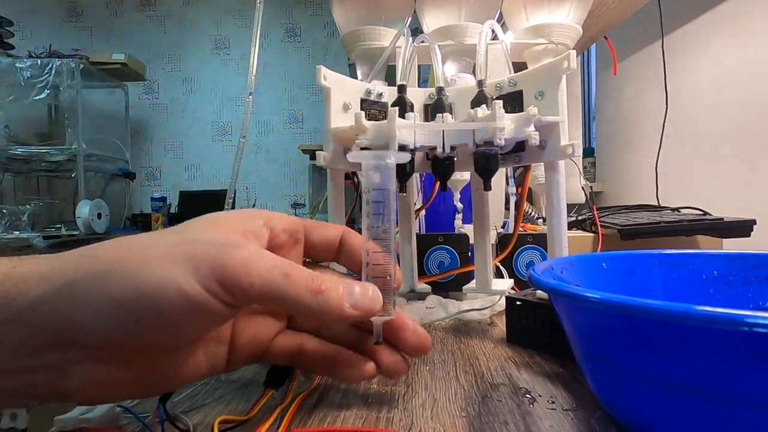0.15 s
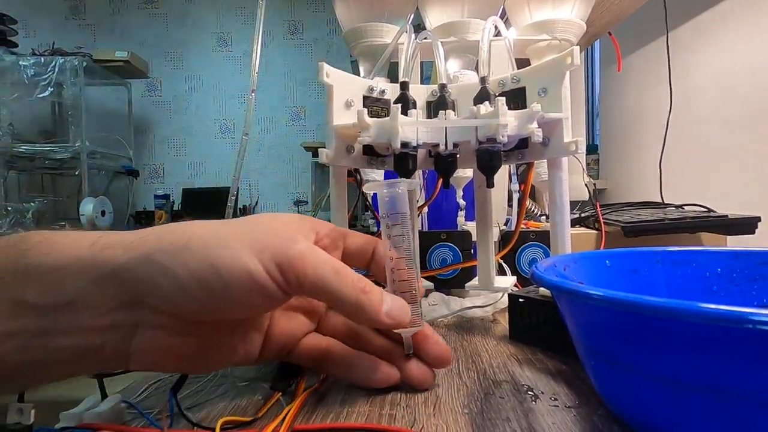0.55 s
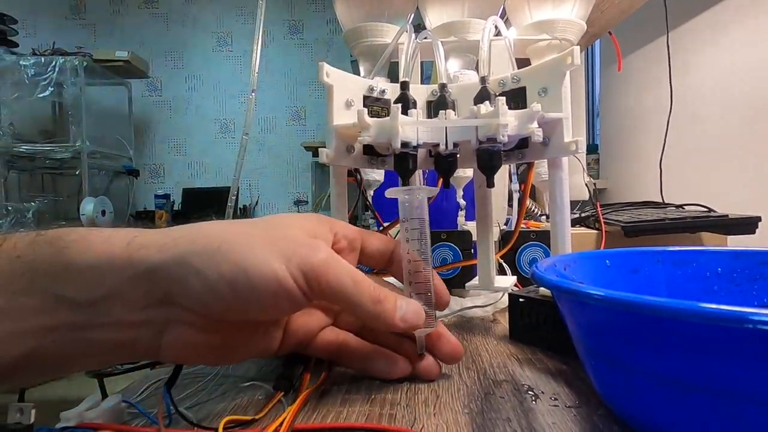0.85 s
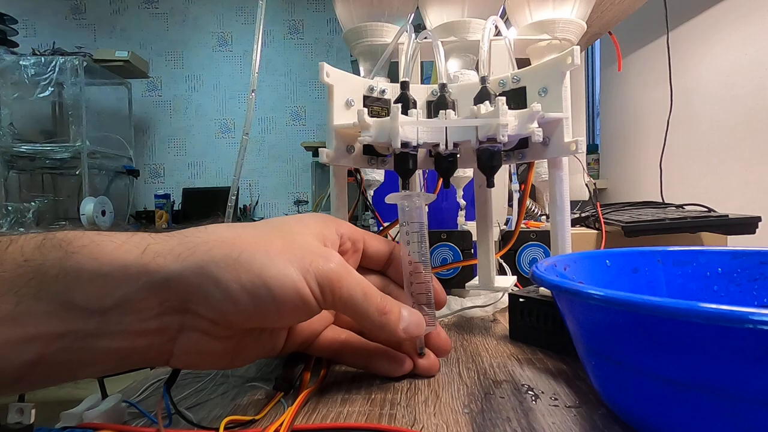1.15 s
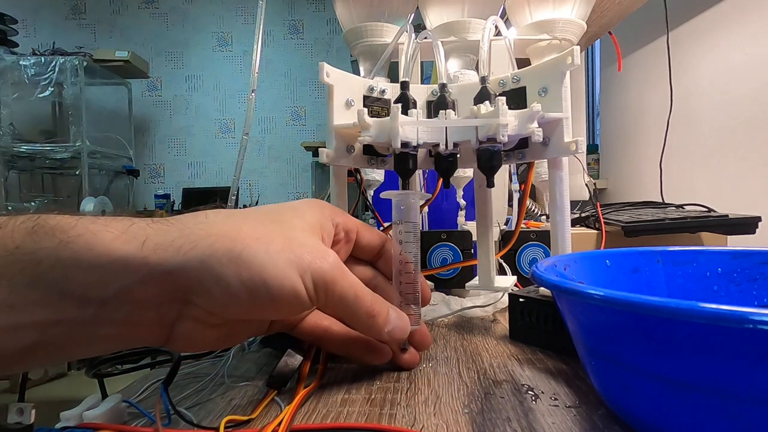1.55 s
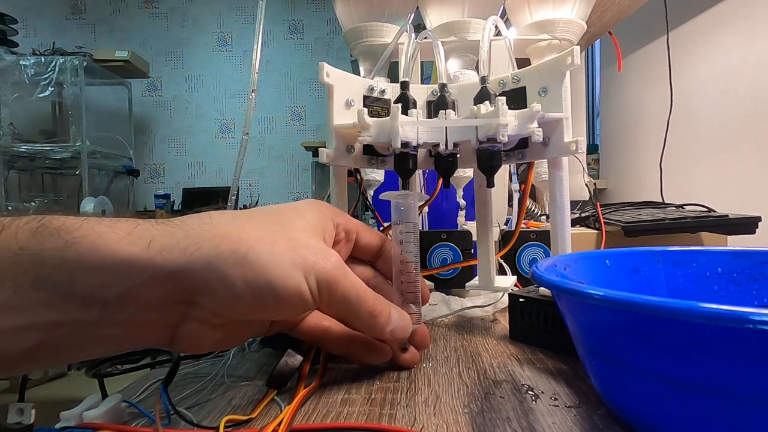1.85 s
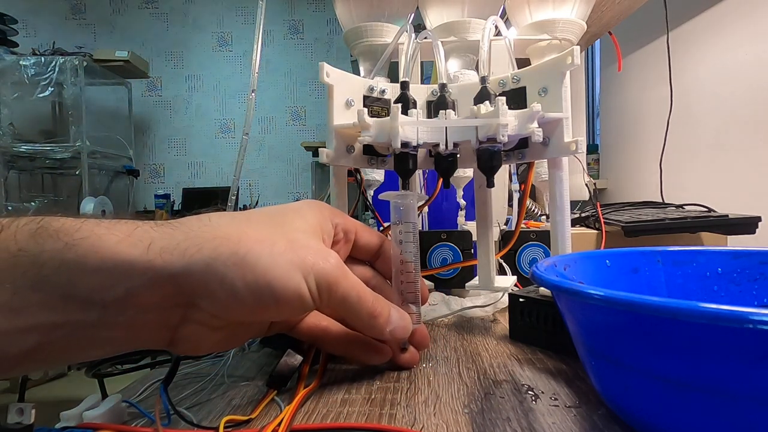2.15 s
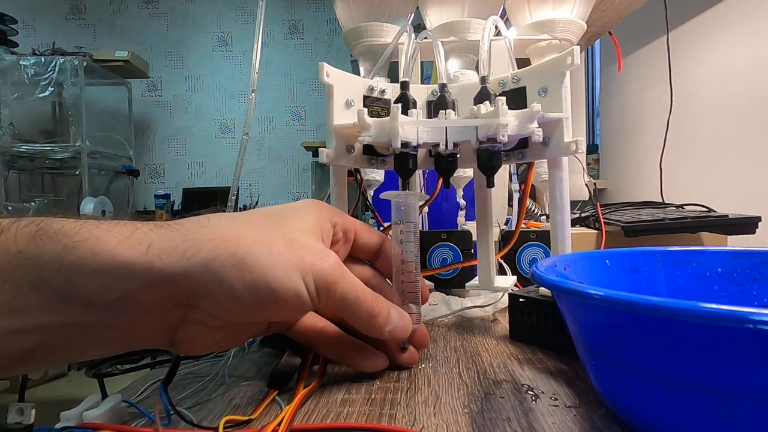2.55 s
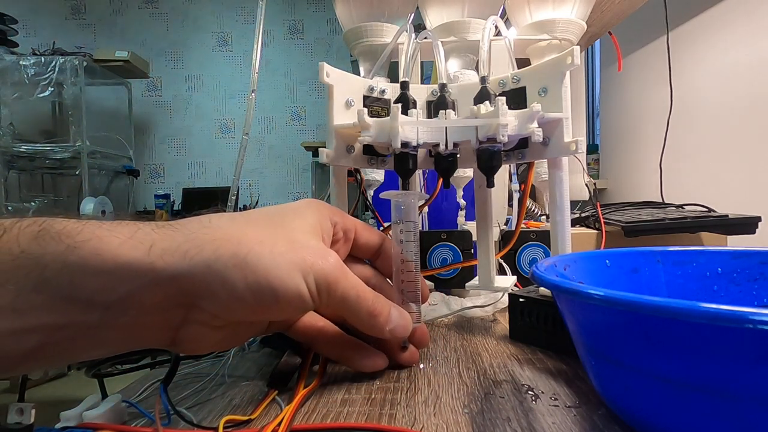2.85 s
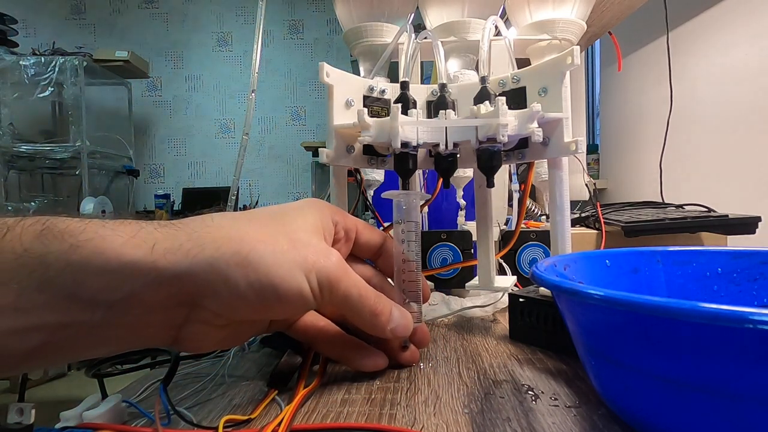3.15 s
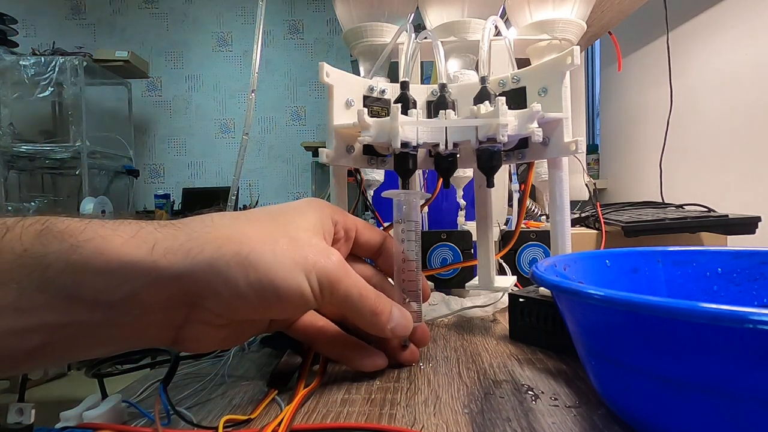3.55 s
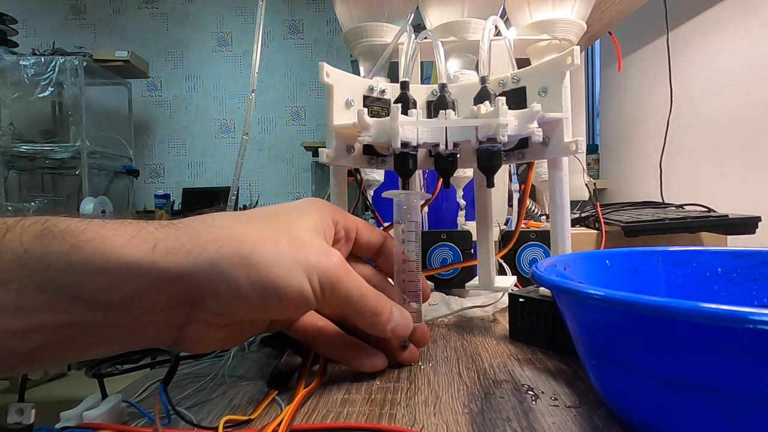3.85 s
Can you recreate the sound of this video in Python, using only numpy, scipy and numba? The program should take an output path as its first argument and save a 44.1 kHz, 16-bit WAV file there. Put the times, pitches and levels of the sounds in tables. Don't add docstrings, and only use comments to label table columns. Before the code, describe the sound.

A small pump motor starts after a switch click, rising quickly into a steady buzzing whirr

```python
import sys
import numpy as np
from scipy import signal
from scipy.fft import rfft, irfft
from scipy.io import wavfile
from scipy.ndimage import uniform_filter1d
from numba import njit

SR = 44100
rng = np.random.default_rng(int(sys.argv[2]) if len(sys.argv) > 2 else 0)


def to_wav(sig):
    pcm = np.clip(np.atleast_2d(sig), -1, 1) * 32767
    pcm = np.round(pcm).astype(np.int16)
    wavfile.write(sys.argv[1], SR, pcm.T)


def attenuation_scalar(level_db):
    decades = np.asarray(level_db, float) / 20
    return 10 ** decades


N = 176400

# frequency in Hz, level in dB per Hz.
ROOM_SPECTRUM = [(15, -31.5), (25, -6), (124, -6), (147, -4.5), (189, 1), (227, -7), (389, -3.5),
                 (657, -10.5), (900, -22.5), (1170, -40.5), (1980, -120)]
# frequency in Hz, level in dB per Hz.
AIR_SPECTRUM = [(530, -37.5), (900, -10), (1040, -1), (1120, -6.5), (1300, -0.5), (2050, -13), (3120, -13),
                (6100, -24.5), (15700, -38.5)]
# centre in Hz, width in Hz, level in dB.
ROOM_HUM = [(34.8, 12, -61.5), (63.6, 22, -60.5), (120.3, 15, -59.5), (185.3, 25, -56.5), (389, 98, -71.5),
            (666.4, 18, -60.5), (835.5, 6.4, -63.5), (1298, 99, -67.5), (3200, 610, -69.5),
            (8800, 900, -86)]
# centre in seconds, length in seconds, pitch in Hz, width in Hz, level in dB.
SKIN_RUBS = [(2.05, 0.024, 8000, 7000, -70.5), (2.098, .016, 9500, 2500, -66),
             (2.182, .015, 9300, 3000, -71), (2.24, .035, 8800, 3500, -71), (2.273, .03, 13000, 3000, -77),
             (2.4, 0.1, 13800, 5000, -76.5), (2.25, 0.2, 7000, 7960, -70)]
# start in seconds, snap in dB, spring ping in dB, thud in dB, case ring in dB.
SWITCH_CLICKS = [
    (2.0298, -21.5, -26, -20, -35.5),
    (2.1640, -34.5, -29.5, -20, -32),
]
# centre in Hz, width in Hz, level in dB.
SNAP_MODES = [(1880, 120, 1.5), (2590, 140, 3), (3900, 460, 0.5), (5200, 890, 1.5), (6880, 1700, 2),
              (7530, 390, 4), (14500, 4500, -9)]
# centre in Hz, width in Hz, level in dB.
THUD_MODES = [(300, 60, 9.3), (565, 113, 6), (800, 167, 2.3)]
# centre in Hz, width in Hz, level in dB.
CASE_MODES = [(1550, 120, -4.5), (1930, 93, -0.5), (2520, 130, 2.5), (5000, 270, -11.5)]
# start in seconds, level in dB, pitch in Hz.
PLASTIC_TICKS = [(0.2986, -32.5, 3250), (0.3691, -50, 3020), (1.711, -51, 5200), (2.548, -39.5, 3200),
                 (2.6623, -41, 3430), (2.6878, -42, 3000), (2.7193, -42, 3460), (2.833, -51, 3200),
                 (2.891, -46, 3460), (3.0121, -26.5, 3850), (3.0708, -31, 3460), (3.088, -46, 3400),
                 (3.1213, -38, 3460), (3.243, -40, 3500), (3.262, -36, 3700), (3.4126, -40, 3600),
                 (3.435, -35.5, 3160), (3.5296, -38, 3460), (3.5838, -36.5, 3450), (3.684, -37.5, 3450),
                 (3.7055, -25.5, 3590), (3.766, -36.5, 3430), (3.936, -34, 3600), (3.9402, -23, 3380)]
# time in seconds, level in dB.
STEP_FORCE = [(2.205, -19), (2.25, -18.5), (2.264, -14), (2.276, -19), (2.31, -19), (2.355, -16),
              (2.39, -20.5), (2.405, -19), (2.44, -22.5), (2.465, -24), (2.5, -20), (2.56, -24),
              (2.61, -44)]
# time in seconds, fast rock in dB, slow rock in dB.
ROTOR_ROCK = [(2.206, -46, -33), (2.214, -29, -25.5), (2.235, -28.5, -34), (2.256, -19, -26),
              (2.283, -27, -19), (2.302, -11.5, -37), (2.316, -22.5, -27), (2.33, -21, -39.5),
              (2.361, -22.5, -44)]
# centre in Hz, width in Hz, level in dB.
BASE_MODES = [(163.3, 8.2, 0.5), (264, 9.6, 7)]
# centre in Hz, width in Hz, level in dB.
FRAME_MODES = [(432, 130, -9), (587, 81, -2.5), (645, 64, -8.5), (988, 110, -15.5), (1212, 64, -4),
               (1305, 80, -4), (1460, 55, -14.5), (1682, 110, -17), (1904, 100, -27), (2210, 230, -36),
               (2700, 130, -24), (3460, 360, -26)]
# time in seconds, level in dB.
STEP_TONE = [(2.6, -37.5), (2.85, -39), (2.95, -38.5), (3.3, -38.5), (3.4, -33.5), (3.53, -40), (3.79, -35),
             (3.89, -38.5), (3.96, -34.5)]
# multiple of the step rate, level in dB, flicker in dB.
PARTIALS = [(.25, -42.5, 1.6), (.5, -58.5, 0.5), (1.75, -72.5, 1.5), (1.999, -65, 1), (2.5, -68, 1.5),
            (3, -60, -2), (3.5, -76.5, 3.5), (4, -79.5, -2.5), (4.25, -77.5, 1)]
# centre in Hz, width in Hz, heard level in dB,
# sideband level in dB, # share that follows the load (dB per dB).
FRAME_SHAKE = [(11.1, 8.8, -79, -20.5, .3), (35.7, 2.5, -51.5, -27, 0.18), (50.02, 2.2, -77.5, -9.5, .1),
               (65.4, 3.9, -51.5, -30, .2), (99.1, 4.4, -55.5, -22.5, 0.18), (132.8, 13, -57.5, -20.5, .5),
               (160.25, 14.4, -43.5, -10.5, 0.55), (177, 11.8, -47.5, -18, 0.98),
               (205.4, 5.3, -49.5, -32, 0.43), (259.6, 17, -47.5, -41, 0.5)]
# multiple of the throb rate, level in dB.
THROB_SIDEBANDS = [(1, -12), (2, -17.5), (3, -14.5), (4, -15)]
# centre in Hz, width in Hz, level in dB.
WHIRR_BANDS = [(568, 220, -52.5), (1010, 210, -54), (1238, 153, -45.5), (2270, 500, -67.5),
               (2850, 980, -64), (3450, 790, -60.5), (4930, 2000, -69.5)]
# centre in seconds, extra load in dB.
TUBE_SQUEEZES = [(2.705, 8), (2.945, 4.5), (3.355, 8.5), (3.45, 4), (3.595, 10), (3.735, 8), (3.93, 5.5)]


@njit
def state_variable(x, hz, width):
    y, b, l = np.empty(len(x)), 0., 0.
    g = np.tan(np.pi * hz / SR)
    for i in range(len(x)):
        k = width[i] / hz
        v = (b + g * (x[i] - l)) / (1 + g * (g + k))
        b, l, y[i] = 2 * v - b, l + 2 * g * v, k * v
    return y


def resonance(x, hz, width):
    return state_variable(x + 1e-18, float(hz), width + np.zeros(N))


def steep(x, hz, width):
    return resonance(resonance(x, hz, width), hz, width)


def body(x, modes, damp=1):
    return sum((-1) ** k * attenuation_scalar(db) * resonance(x, hz, width * damp) for k, (hz, width, db) in enumerate(modes))


def unit(x):
    return x / np.sqrt(np.mean(np.abs(x) ** 2))


def unit_peak(x):
    return x / np.abs(x).max()


def narrow(hz, width):
    return unit(steep(rng.standard_normal(N), hz, width))


def coloured(spectrum):
    f = np.maximum(np.arange(N // 2 + 1) * SR / N, 1)
    hz, db = np.transpose(spectrum)
    gain = attenuation_scalar(np.interp(np.log(f), np.log(hz), db))
    return unit(irfft(rfft(rng.standard_normal(N)) * gain, N))


def walk(rate):
    k = int(SR / rate)
    held = np.repeat(rng.standard_normal(N // k + 1), k)
    return unit(uniform_filter1d(uniform_filter1d(held, k), k)[:N])


def curve(table, col):
    return np.interp(np.arange(N) / SR, [r[0] for r in table], [r[col] for r in table])


def bump(t, centre_s, width_s):
    return np.exp(-((t - centre_s) / width_s) ** 2)


def burst(at_s, decay_s):
    t = np.arange(N) / SR - at_s
    return rng.standard_normal(N) * np.exp(-np.maximum(t, 0) / decay_s) * (t >= 0)


def place(x, pan_db, lag_us):
    late = np.interp(np.arange(N) - lag_us * 1e-6 * SR, np.arange(N), x)
    return np.array([late * attenuation_scalar(pan_db / 2), x * attenuation_scalar(-pan_db / 2)])


def room():
    hum = sum(attenuation_scalar(db + 2.14 * walk(5.86)) * narrow(hz, width) for hz, width, db in ROOM_HUM)
    low = attenuation_scalar(-46.5 + 0.43 * walk(1.95)) * coloured(ROOM_SPECTRUM)
    air = attenuation_scalar(-56.75 + 0.72 * walk(4.7)) * coloured(AIR_SPECTRUM)
    hiss = attenuation_scalar(-82.5) * narrow(13500, 5000)
    return low + air + hum + hiss * np.array([[1], [-1]])


def room_tail(x):
    t60_s, first_echo_s, centre_hz, level_db = 0.18, 0.004, 3080, -13
    t = np.arange(12000) / SR
    tail = rng.standard_normal(12000) * attenuation_scalar(-60 * t / t60_s) * (t > first_echo_s)
    tail = state_variable(tail + 1e-18, float(centre_hz), np.full(12000, 2. * centre_hz))
    tail = attenuation_scalar(level_db) * tail / np.sqrt(np.sum(tail ** 2))
    return signal.fftconvolve(x, tail[None], axes=1)[:, :N]


def finger():
    t = np.arange(N) / SR
    return sum(attenuation_scalar(db + 2.5 * walk(60)) * bump(t, s, length_s) * narrow(hz, width)
               for s, length_s, hz, width, db in SKIN_RUBS)


def switch():
    out = np.zeros(N)
    for s, snap_db, ping_db, thud_db, case_db in SWITCH_CLICKS:
        out += attenuation_scalar(snap_db) * unit_peak(body(burst(s, 0.00089), SNAP_MODES))
        out += attenuation_scalar(ping_db) * unit_peak(resonance(burst(s - 0.0004, 0.0014), 8740, 460))
        out += attenuation_scalar(thud_db) * unit_peak(body(burst(s + 0.0011, 0.0047), THUD_MODES))
        out += attenuation_scalar(case_db) * unit_peak(body(burst(s + 0.001, 0.0044), CASE_MODES))
    return out


def tick_modes(b, hz):
    t = np.zeros(N)
    t[:len(b)] = b
    sound = steep(t, hz, 1700) + attenuation_scalar(-12.5) * steep(t, 5600, 3200) + attenuation_scalar(-14) * resonance(t, 2600, 1800)
    return sound[:len(b)]


def ticks():
    out, t = np.zeros(N), np.arange(1024) / SR
    for s, db, hz in PLASTIC_TICKS:
        hit = rng.standard_normal(len(t)) * np.exp(-t / 0.0012)
        k = int(s * SR)
        out[k:k + len(t)] += attenuation_scalar(db - 3) * unit_peak(tick_modes(hit, hz))
    return out + attenuation_scalar(-41) * unit_peak(steep(burst(PLASTIC_TICKS[0][0], 0.0025), 1800, 900))


def chatter(speed):
    hits_per_s, level_db = 55, -65
    hits = (rng.random(N) < hits_per_s / SR) * attenuation_scalar(3.7 * rng.exponential(size=N)) * speed ** 2
    puffs = signal.lfilter([1], [1, -0.96], hits) * rng.standard_normal(N)
    return attenuation_scalar(level_db) * 10 * (steep(puffs, 2950, 1500) + attenuation_scalar(-10) * steep(puffs, 4800, 2300))


def motor_speed(t, start_s, full_s):
    start_hz, full_hz, slip = 60.27, 1152.3, 0.01793
    hz = np.interp(t, [start_s, full_s], [start_hz, full_hz]) * (t > start_s)
    hz = hz * (1 + slip * walk(45) * np.clip((full_s - t) / 0.033, 0, 1))
    return np.cumsum(hz) / SR, hz / full_hz


def rotor_rocking(t):
    first_s, last_s = ROTOR_ROCK[0][0], ROTOR_ROCK[-1][0]
    gate = np.clip((t - first_s) / 0.0045, 0, 1) * np.clip((last_s + 0.0077 - t) / 0.0069, 0, 1)
    gate = gate * attenuation_scalar(1.5 * walk(90))
    rock = 0
    for hz, col in [(265.4, 1), (152.4, 2)]:
        angle = 2 * np.pi * np.cumsum(hz * (1 + 0.0057 * walk(30.2))) / SR
        rock = rock + np.sqrt(2) * attenuation_scalar(curve(ROTOR_ROCK, col)) * gate * np.sin(angle)
    return rock


def step_train(t, phase, rock, start_s, full_s):
    uneven = 1 + 0.29 * rng.standard_normal(2000)[np.minimum(phase.astype(int), 1999)]
    shaken = phase + 0.35 * rock + 0.016 * walk(150)
    steps = sum(attenuation_scalar(-4.5 * np.log2(k)) * np.cos(2 * np.pi * k * shaken) for k in range(1, 9))
    gate = (t > start_s) * np.clip((full_s + 0.02 - t) / 0.027, 0, 1)
    return steps * uneven * attenuation_scalar(curve(STEP_FORCE, 1) + 2.8 * walk(80)) * gate


def ramp(t, phase, start_s, full_s):
    grip_s, rebound_s = 2.121, 0.01087
    rock = rotor_rocking(t)
    coast = attenuation_scalar(-42 + 3.7 * walk(40)) * narrow(245, 110)
    coast = coast * (t > ROTOR_ROCK[-1][0]) * np.clip((full_s - t) / 0.05, 0, 1)
    steps = step_train(t, phase, rock, start_s, full_s)
    push, rebound = bump(t, grip_s, 0.00085), bump(t, grip_s + rebound_s, 0.00082)
    grip = attenuation_scalar(-31.5) * 20 * (push - attenuation_scalar(3.5) * rebound)
    knock = attenuation_scalar(-21.5) * burst(grip_s - 0.002, 0.0041) + attenuation_scalar(-26) * burst(start_s + 0.00088, 0.0031)
    frame = attenuation_scalar(-6) * steep(knock, 1200, 2200)
    frame = frame + sum(attenuation_scalar(db) * steep(steps + knock, hz, width) for hz, width, db in FRAME_MODES)
    hold_damp = 1 + 6 * np.clip((t - 2.185) / 0.011, 0, 1)
    base = body(grip, BASE_MODES, hold_damp)
    return place(base + rock + coast, 0.26, 60) + place(frame, -0.19, 62)


def running(t, phase, speed, full_s):
    load_db = sum(db * bump(t, s, 0.035) for s, db in TUBE_SQUEEZES) - 3.5
    heard, carry, rumble = 0, 0, 0
    for hz, width, db, side_db, share in FRAME_SHAKE:
        shake = narrow(hz, width) * attenuation_scalar(share * load_db)
        if hz < 80:
            rumble = rumble + attenuation_scalar(db) * shake
        else:
            heard = heard + attenuation_scalar(db) * shake
        carry = carry + attenuation_scalar(side_db) * signal.hilbert(shake) / np.sqrt(2)
    throb = 2 * np.pi * 34.27 * (t - 2.859) + 0.22 * walk(5.4)
    carry = carry + sum(attenuation_scalar(db + 1.9 * walk(9)) * np.exp(1j * k * throb) for k, db in THROB_SIDEBANDS)

    turn = np.exp(2j * np.pi * phase)
    sidebands = 1 + carry + 0.05 * np.conj(carry)
    tone_level = np.sqrt(2) * attenuation_scalar(curve(STEP_TONE, 1) + 3.5 + 1.1 * walk(29.94))
    tone = tone_level * np.real(turn * sidebands)
    buzz = attenuation_scalar(-63.5) * np.real(turn ** 3 * unit(carry))
    parts = [np.sqrt(2) * attenuation_scalar(db + flicker_db * walk(11)) * np.cos(2 * np.pi * k * phase)
             for k, db, flicker_db in PARTIALS]
    whirr = [attenuation_scalar(db + 0.22 * load_db + 2.3 * walk(20)) * narrow(hz, width) for hz, width, db in WHIRR_BANDS]

    on = np.clip((t - full_s + 0.053) / 0.035, 0, 1)
    low = speed ** 0.33 * (t > ROTOR_ROCK[-1][0]) * heard + speed ** 3 * (parts[0] + parts[1] + whirr[0])
    middle = on * (tone + whirr[1] + whirr[2])
    high = on * (sum(parts[2:]) + buzz) + speed ** 0.93 * sum(whirr[3:])
    side = attenuation_scalar(-57) * speed * narrow(200, 200)
    return (place(low, 0.3, 25) + place(speed ** 3 * rumble, 5, 1150) + place(middle, -2.7, 110)
            + place(high, 1.2, 22) + side * np.array([[1], [-1]]))


def scene():
    t = np.arange(N) / SR
    start_s, full_s = 2.207, 2.603
    phase, speed = motor_speed(t, start_s, full_s)
    hand = place(switch() + finger(), 0.5, 7)
    near = ramp(t, phase, start_s, full_s) + place(ticks() + chatter(speed), 1.8, 37)
    echoes = room_tail(near + attenuation_scalar(-12.5) * hand)
    return near + hand + echoes + running(t, phase, speed, full_s) + room()


def band_limit(x):
    return signal.sosfilt(signal.butter(12, 15730, fs=SR, output="sos"), x)


def record(dry):
    top_cut = signal.ellip(8, 0.2, 60, 15750, fs=SR, output="sos")
    mix = signal.sosfilt(top_cut, dry)
    return band_limit(mix)


dry = scene()
out = record(dry)
to_wav(out)
```